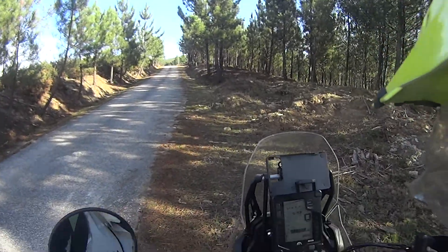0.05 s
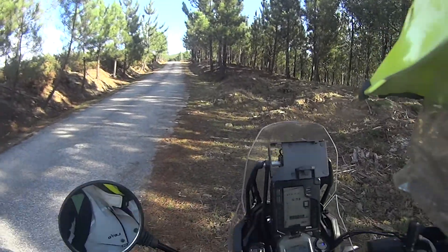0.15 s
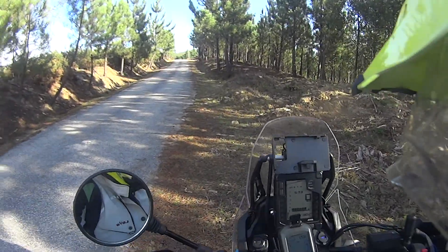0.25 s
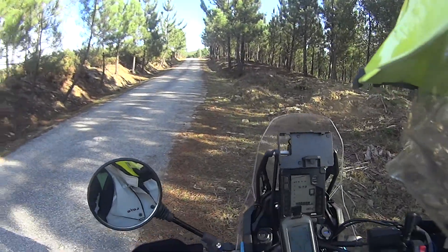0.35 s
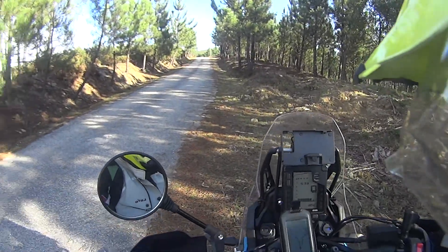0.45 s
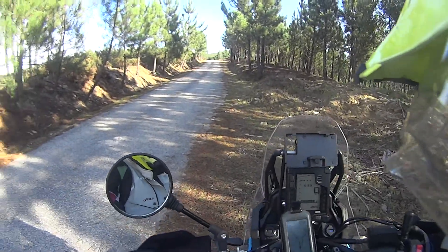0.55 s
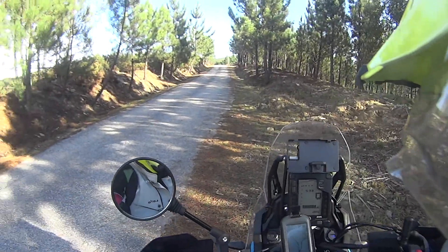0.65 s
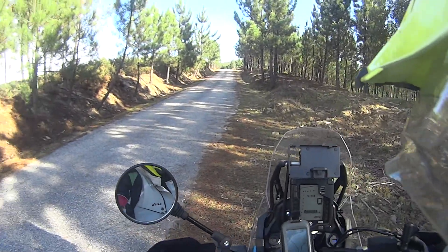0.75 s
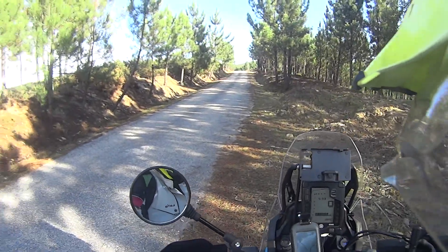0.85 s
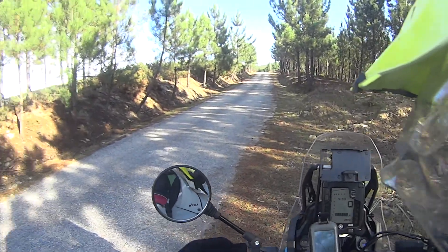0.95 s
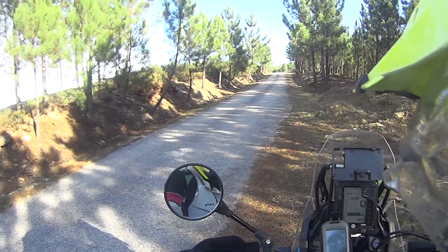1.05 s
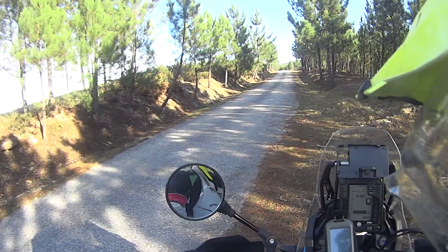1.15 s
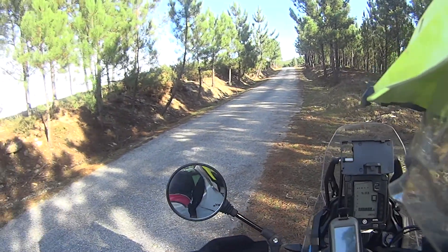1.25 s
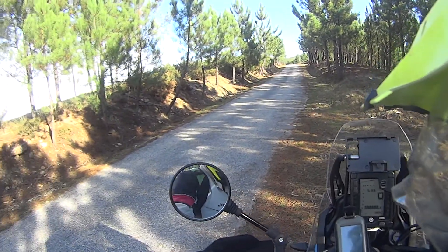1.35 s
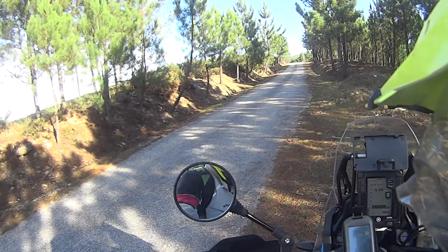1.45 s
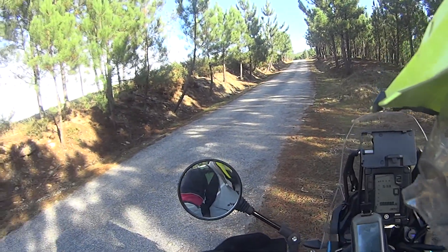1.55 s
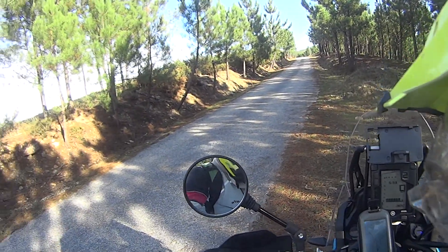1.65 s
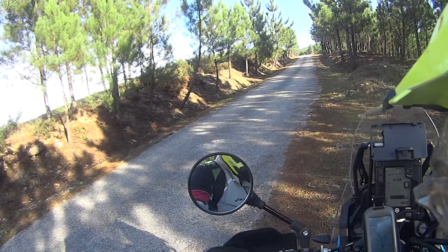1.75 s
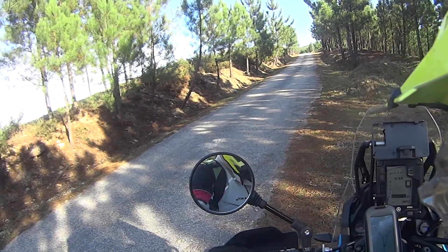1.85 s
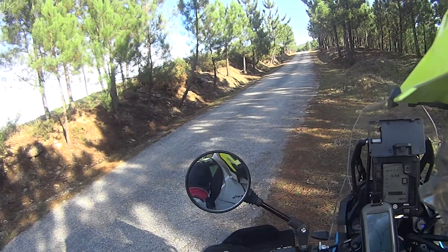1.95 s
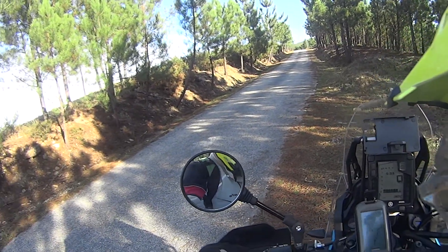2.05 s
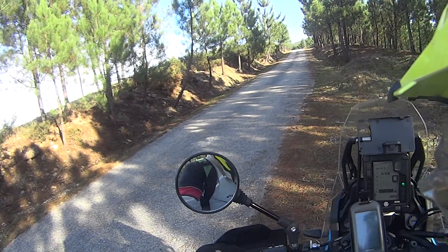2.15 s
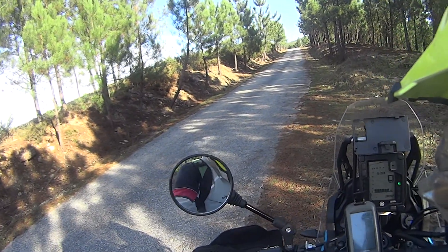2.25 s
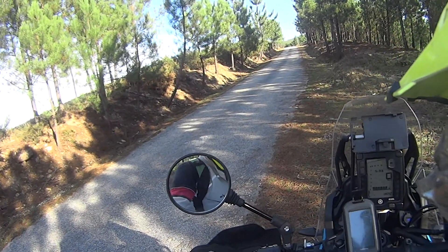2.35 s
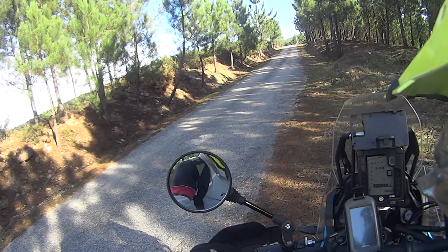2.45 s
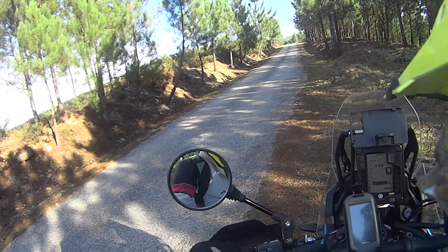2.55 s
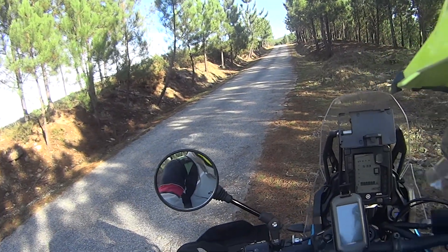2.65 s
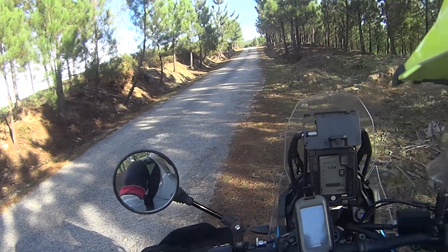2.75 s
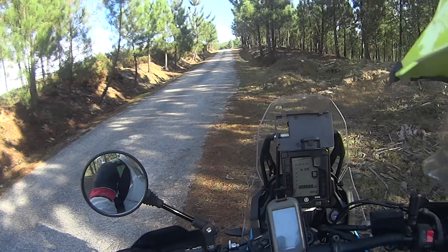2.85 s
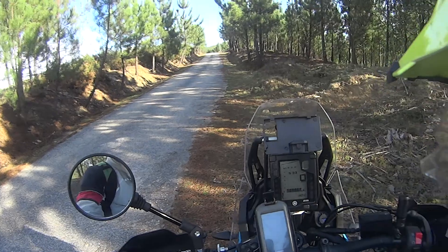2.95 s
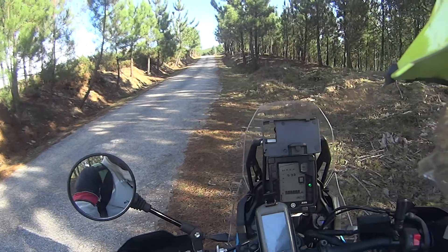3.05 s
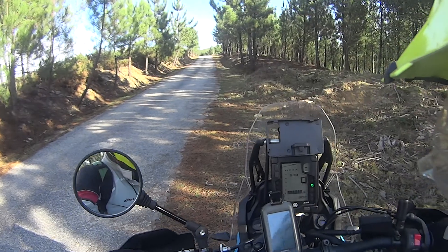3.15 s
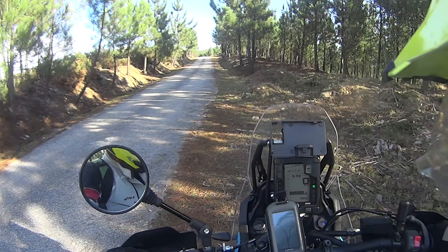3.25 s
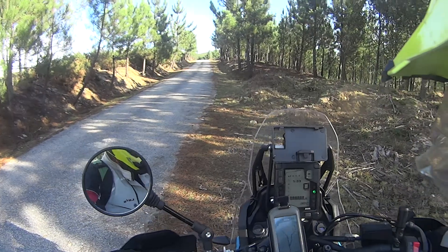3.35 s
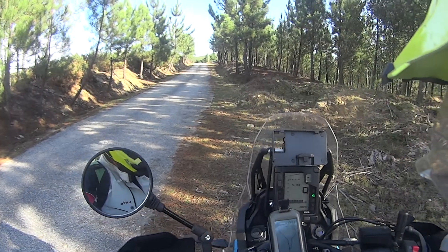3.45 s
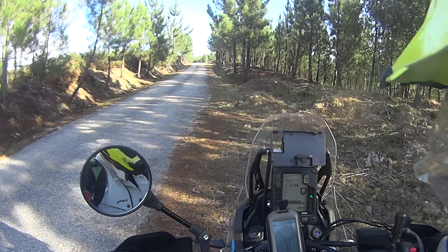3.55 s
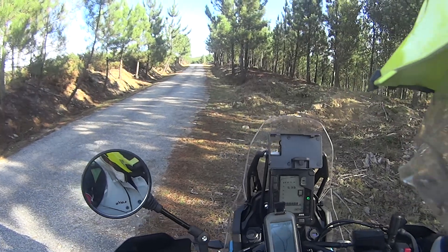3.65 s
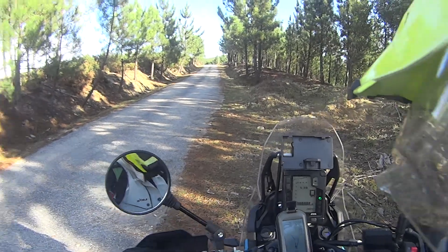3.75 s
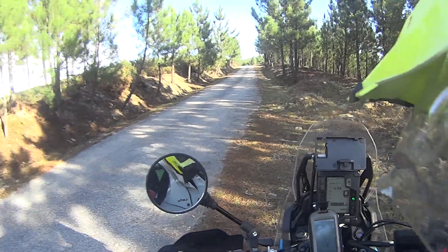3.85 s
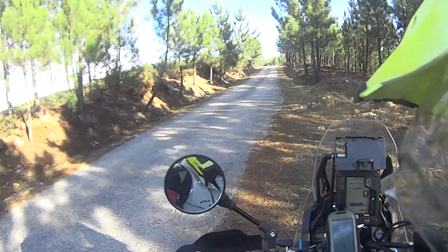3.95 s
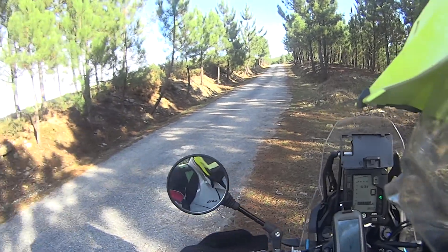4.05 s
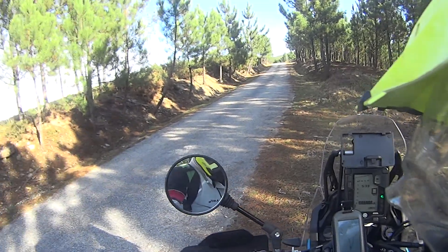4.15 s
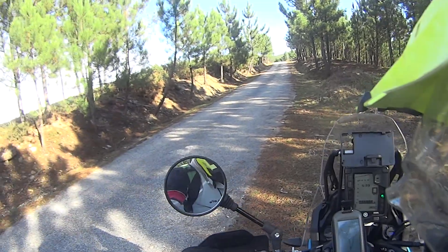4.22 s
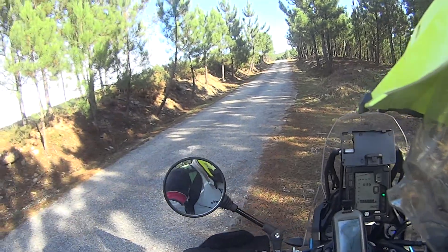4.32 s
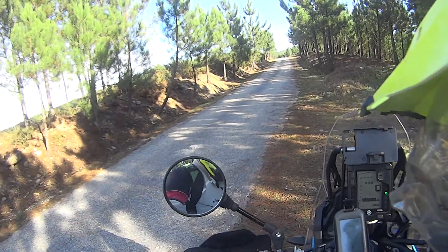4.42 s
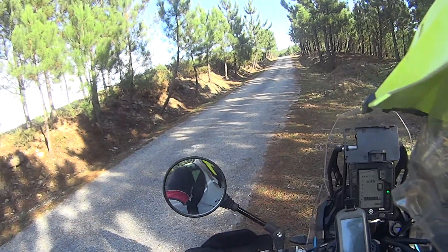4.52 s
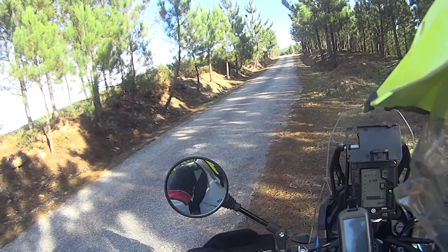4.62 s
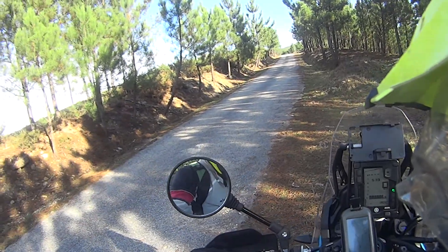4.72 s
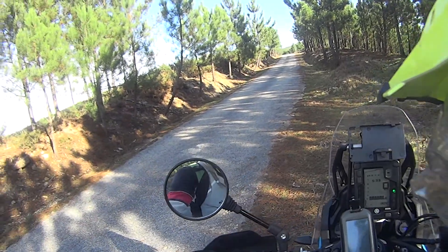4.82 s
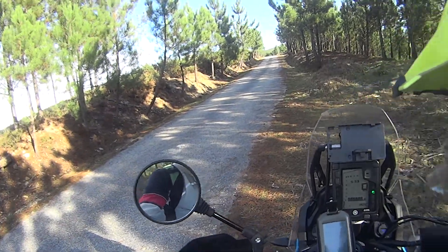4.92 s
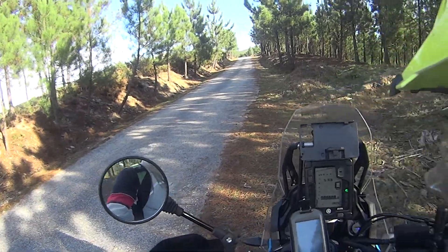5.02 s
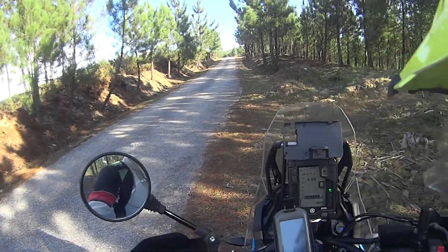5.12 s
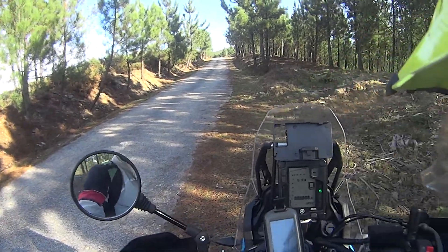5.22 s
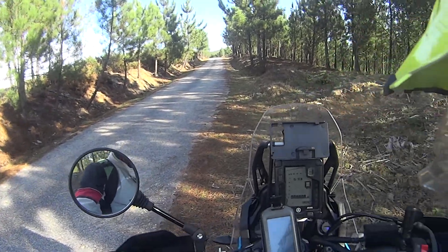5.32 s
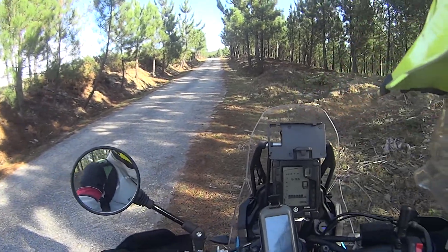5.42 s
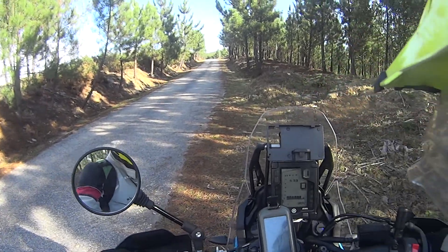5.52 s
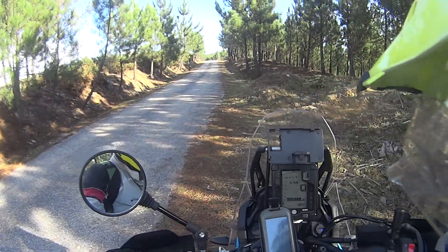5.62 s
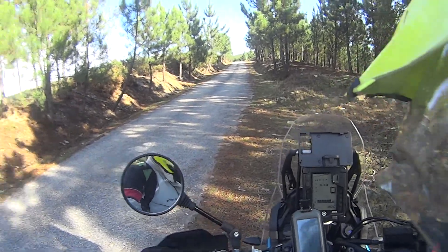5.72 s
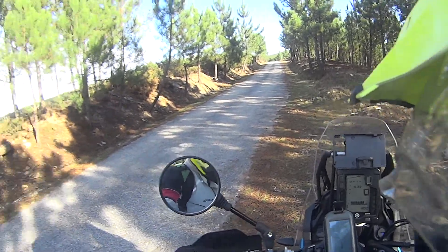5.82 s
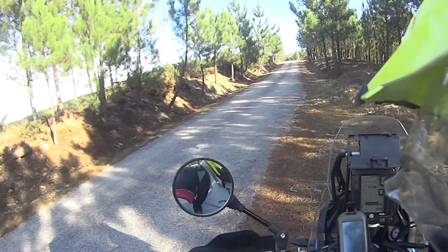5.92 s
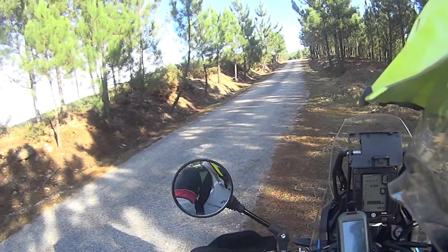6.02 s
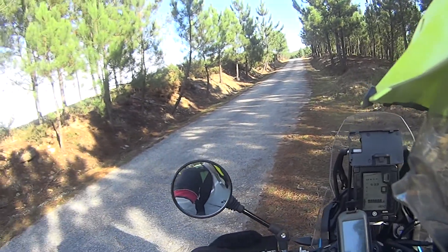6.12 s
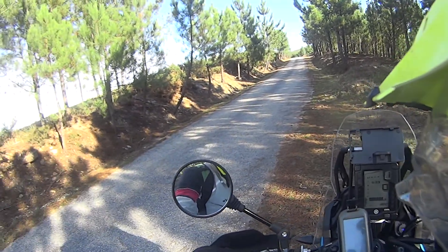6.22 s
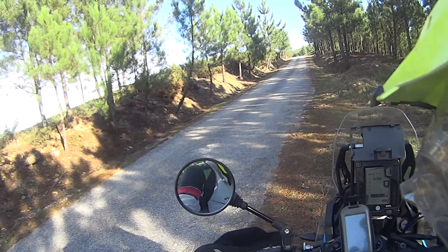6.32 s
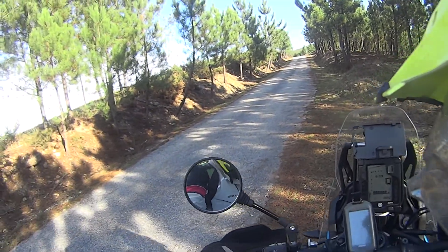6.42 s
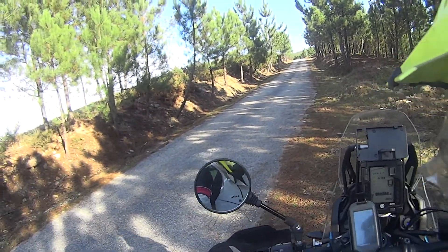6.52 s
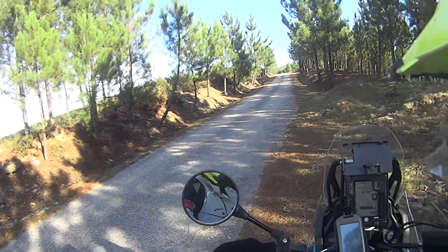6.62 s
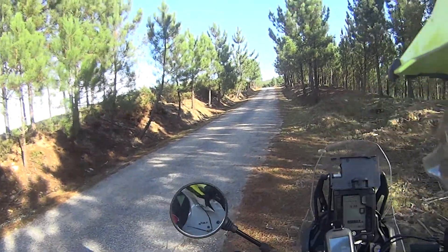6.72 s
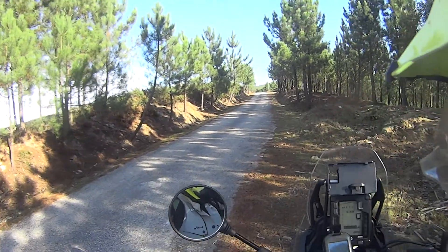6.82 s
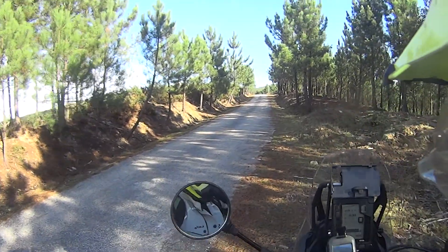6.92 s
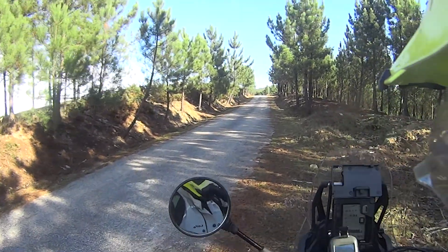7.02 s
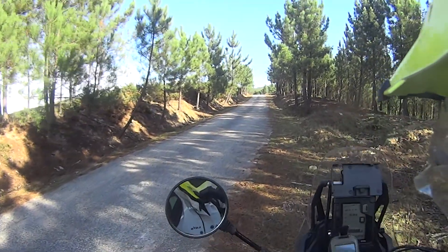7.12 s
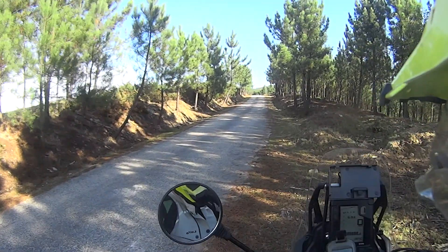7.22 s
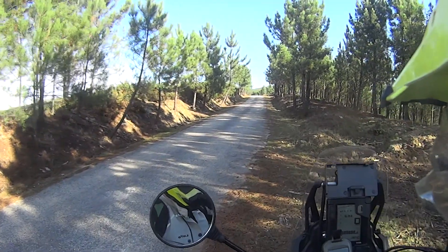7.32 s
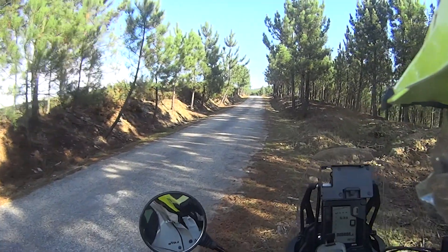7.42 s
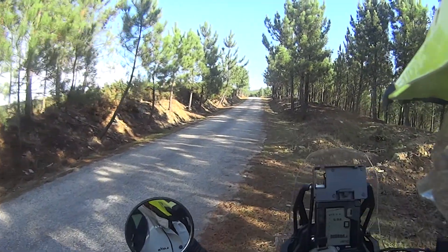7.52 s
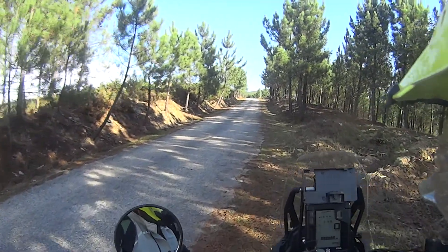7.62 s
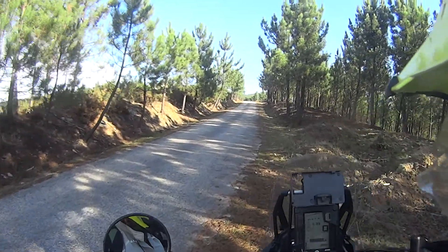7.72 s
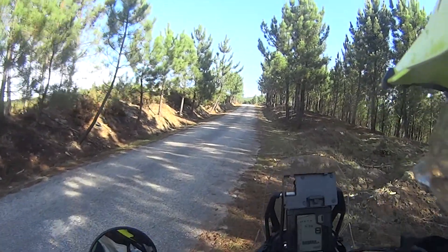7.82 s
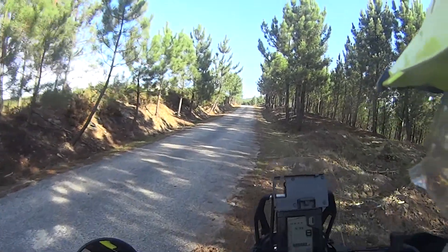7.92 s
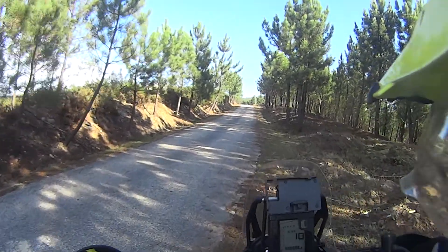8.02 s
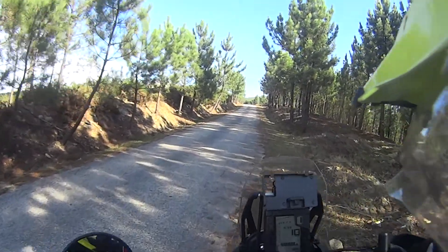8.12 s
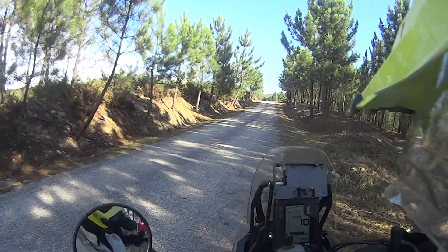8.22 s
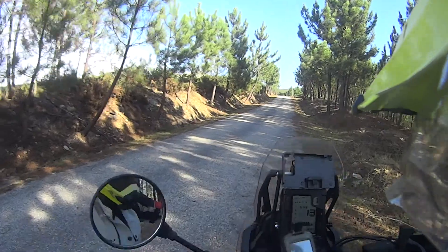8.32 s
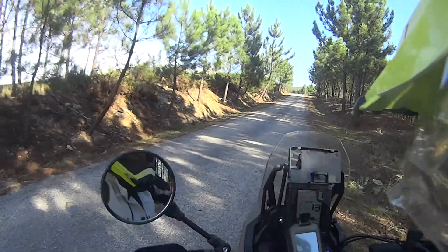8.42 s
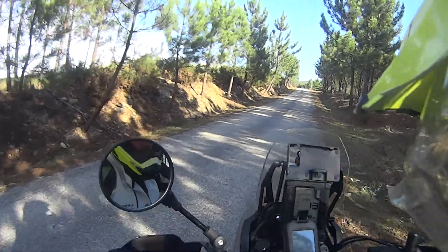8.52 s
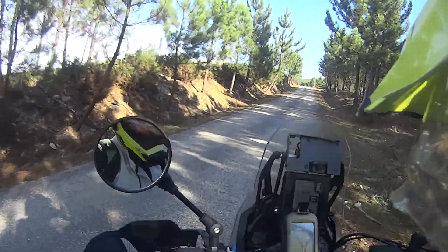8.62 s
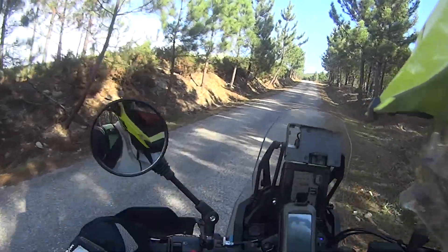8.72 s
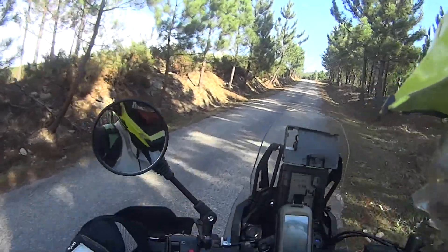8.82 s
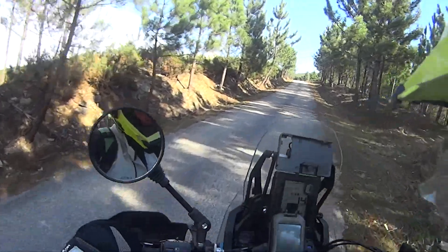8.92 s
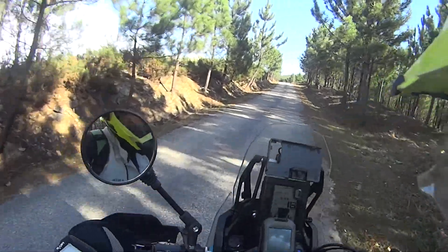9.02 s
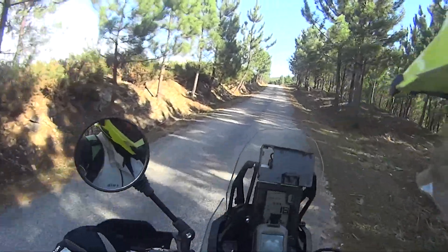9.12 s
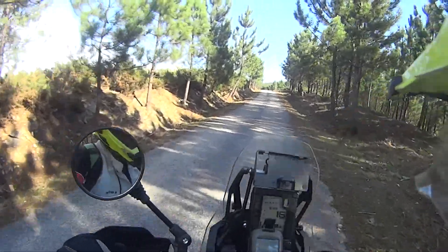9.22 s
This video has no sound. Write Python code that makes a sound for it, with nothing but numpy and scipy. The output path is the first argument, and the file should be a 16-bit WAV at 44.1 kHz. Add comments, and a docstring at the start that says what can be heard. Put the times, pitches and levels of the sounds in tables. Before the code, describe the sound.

From the rider's seat on a forest road, a motorcycle's twin engine ticks over with a low, lumpy beat and bright valve ticks. Short metallic rattles lead to a sharper clash as it goes into gear. After a quick rev the engine sags under load, then rises steadily as the bike moves off. A soft rolling hiss builds, and brief low wind buffets reach the close stereo microphone.

```python
"""A twin-cylinder motorcycle idles close by on a forest road, drops into gear, blips the throttle
and pulls away. The cylinders fire unevenly into the silencer and set it booming; the valve gear ticks
once a cycle over the whirr of the cases. As the wheels turn, chain and tyres hiss and the first gusts
of headwind buffet a small stereo microphone on the rider."""
import sys
import numpy as np
from scipy import signal
from scipy.fft import rfft, irfft
from scipy.io import wavfile

SR = 44100
rng = np.random.default_rng(int(sys.argv[2]) if len(sys.argv) > 2 else 0)


def int16_out(signal):
    """Quantize to a 16-bit WAV file."""
    q = np.round(np.clip(np.atleast_2d(signal).T, -1, 1) * 32767)
    wavfile.write(sys.argv[1], SR, q.astype(np.int16))


N = 408807
BLIP_S, SHUT_S, PULL_S, THROTTLE_MOVE_S = 5.92, 6.056, 6.19, 0.046
IDLE_RPM, MAX_CYCLES = 1300, 200   # a cycle is two turns of the crank


def from_db(db):
    """Decibels to amplitude."""
    return 10 ** (np.asarray(db) / 20)


def unit_rms(x):
    """Scale to an rms of 1."""
    return x / np.sqrt(np.mean(x ** 2) + 1e-20)


def delayed(x, delay_s):
    """The same signal, arriving later."""
    return np.pad(x, (round(delay_s * SR), 0))[:N]


def over_time(rows):
    """One curve per column, through rows that begin with a time in seconds."""
    times, *columns = np.transpose(rows)
    return [np.interp(np.arange(N) / SR, times, column) for column in columns]


def over_frequency(rows):
    """One curve per column across the FFT bins, interpolated in log frequency."""
    freqs, *columns = np.transpose(rows)
    hz = np.arange(N // 2 + 1) * SR / N + 1
    return [np.interp(np.log(hz), np.log(freqs), column) for column in columns]


def coloured_noise(spectrum):
    """Noise of rms 1 with this spectral shape."""
    shape_db, = over_frequency(spectrum)
    return unit_rms(irfft(rfft(rng.standard_normal(N)) * from_db(shape_db), N))


def drift(rate_hz):
    """Random wander of rms 1, smoothed above rate_hz."""
    step = 40   # samples per point
    pole = np.exp(-2 * np.pi * rate_hz * step / SR)
    noise = rng.standard_normal(N // step + 2002)
    slow = signal.lfilter([1], [1, -2 * pole, pole * pole], noise)[2000:]
    return np.interp(np.arange(N) / step, np.arange(len(slow)), unit_rms(slow))


def ring(clicks, hz, t60):
    """A unit click starts a decaying sine of height 1."""
    pole, angle = from_db(-60 / (t60 * SR)), 2 * np.pi * hz / SR
    return signal.lfilter([0, np.sin(angle)], [1, -2 * pole * np.cos(angle), pole * pole], clicks + 1e-18)


def headwind():
    """Gusts press on both microphone ports in low, lumpy swings."""
    # gusts: centre_s, level_db, half_length_s
    gusts = [(6.124, -45.5, 0.056), (8.684, -52, 0.044), (8.76, -50, .04), (8.825, -40, 0.035),
             (8.9, -49, .04), (8.97, -51, 0.06)]
    t = np.arange(N) / SR
    lumps = coloured_noise([(12, -13), (25, -6), (40, 0), (55, -2), (120, -27), (400, -58)])
    out = np.zeros(N)
    for centre_s, db, half_s in gusts:
        swell = np.exp(-((t - centre_s) / half_s) ** 2)
        gust = swell * lumps
        out += from_db(db) * gust * np.sqrt(np.sum(swell ** 2) / np.sum(gust ** 2))
    return out


def chain_and_tyres():
    """A grainy midrange hiss grows as the wheels start to turn."""
    # rise of the hiss: time_s, level_db
    levels = [(6.3, -83), (6.7, -62.5), (7.7, -54.5), (8.2, -51.5), (8.7, -52.5), (9.27, -43)]
    # its colour: freq_hz, density_db
    spectrum = [(300, -28), (500, -11), (750, -9), (950, 0), (1150, 2), (1500, -5), (2500, -32)]
    return from_db(over_time(levels)[0] + 2.1 * drift(41)) * coloured_noise(spectrum)


def gear_rattles():
    """Short grating clashes of metal; only the hard ones reach the low ring of the gearbox."""
    # gear lever, clutch and loose parts: start_s, strength_db, rise_s, t60_s
    hits = [(0.066, -25, 0.0016, 0.038), (1.825, -24, 0.0047, 0.073), (3.07, -25, 0.004, 0.065),
            (3.0945, -25, .0015, 0.06), (3.128, -33, .004, 0.18), (4.435, -23.5, 0.011, 0.18),
            (4.489, -23, 0.0049, 0.031), (4.536, -22.5, 0.0031, 0.036), (4.561, -26, 0.0022, 0.066),
            (5.304, -15.5, 0.0054, 0.14), (5.318, -13, 0.0036, 0.046), (5.326, -32, 0.003, 0.032),
            (5.397, -19, 0.0012, 0.046), (5.413, -29, 0.0024, 0.04), (5.498, -21.5, 0.0032, 0.051),
            (5.639, -23.5, 0.0027, 0.07), (5.65, -28, 0.001, 0.052), (5.659, -29, 0.0018, 0.044),
            (5.67, -29, .001, .07), (5.685, -27, .003, 0.036), (5.87, -25, .003, 0.038),
            (5.941, -29, 0.0018, .06)]
    # clashing metal: freq_hz, density_db
    spectrum = [(88, -47), (150, 1), (276, -8), (425, -3.5), (1040, 0.5), (1320, 13.5), (1500, -8.5),
                (2030, -5), (2760, 0), (3000, -1), (3300, 2.5), (3650, -1.5), (4020, 1), (4320, -2),
                (5170, 1), (5860, -5), (6400, -4), (6800, 0), (7150, -6), (7500, -1.5), (11000, -17),
                (14300, -54), (22000, -120)]
    bright, deep, t = np.zeros(N), np.zeros(N), np.arange(SR // 2) / SR
    for start_s, db, rise_s, t60 in hits:
        at = round(start_s * SR)
        burst = from_db(db - 11 - 60 * t / t60) * np.minimum(t / rise_s, 1)
        bright[at:at + len(t)] += burst
        deep[at:at + len(t)] += burst * from_db(min(0.79 * (db + 12.5), 0) - 100 * t)
    clash = coloured_noise(spectrum) * from_db(0.36 * drift(200))
    low = signal.sosfiltfilt(signal.butter(2, 1900, fs=SR, output="sos"), clash)
    return bright * (clash - low) + delayed(deep, 0.0056) * low   # the ring follows the clash


def contact_envelope(contacts, cycle, load, uneven_db):
    """Engine parts touch at the same point of each cycle, with a new strength every time."""
    power = np.zeros(N)
    for position, half_length, unloaded_db, loaded_db in contacts:
        count, phase = np.divmod(cycle - position + 1.5, 1)
        chance = np.clip(rng.standard_normal(MAX_CYCLES), -2, 2)[count.astype(int)]
        db = unloaded_db + load * (loaded_db - unloaded_db) + uneven_db * (0.66 - load) * chance
        swell = np.exp(-((phase - .5) / half_length) ** 2)
        power += (from_db(db) * swell) ** 2
    return np.sqrt(power)


def case_whirr(cycle, load):
    """Gears and chains whirr inside the cases, swelling as the pistons knock."""
    # cases running light: freq_hz, density_db
    whirr = [(180, -11.5), (300, -2.5), (328, -11), (431, -3.5), (667, -12.5), (1420, 0.5), (1550, -8.5),
             (1720, -3), (2060, -9.5), (3150, -2.5), (4190, -4.5), (5020, -3), (6020, -10), (7660, -10),
             (11000, -16.5), (14300, -117), (22000, -120)]
    # cases under load: freq_hz, density_db
    roar = [(180, -3.5), (300, -7), (406, -6), (741, -14), (1000, -11), (1150, -3), (1420, -4), (1550, -9),
            (1830, -10), (2290, -7.5), (3200, -2.5), (4070, -5), (5420, -6), (6020, -11.5), (7430, -11),
            (11000, -19), (14300, -101), (22000, -120)]
    # piston knocks: position_cycles, half_length_cycles, unloaded_db, loaded_db
    pistons = [(0.465, 0.061, -12, 0.5), (0.84, 0.15, -4, -2.5), (0.9, 0.04, -25, 1.5),
               (0.38, 0.21, -2, -16.5), (0.032, 0.15, -7, -6), (0.597, 0.064, -13, -5)]
    body = unit_rms((1 - load) * coloured_noise(whirr) + load * coloured_noise(roar))
    knocks = from_db(2.5) * contact_envelope(pistons, cycle, load, uneven_db=0.65)
    flicker = from_db(0.32 * drift(1.4) + drift(44) + drift(100))
    return body * flicker * np.hypot(from_db(-3 * load), knocks)


def valve_ticks(cycle, load):
    """Each contact in the valve gear gives a bright tick of noise."""
    # colour of a tick: freq_hz, density_db
    spectrum = [(1500, -25), (2200, -12.5), (3200, -0.5), (4300, -9.5), (5000, -1), (6000, -5.5),
                (7500, -4.5), (9000, -5.5), (11000, -17)]
    # valve gear contacts: position_cycles, half_length_cycles, unloaded_db, loaded_db
    contacts = [(0.924, 0.049, -1.5, -6.5), (0.32, 0.059, -30, 4), (0.26, 0.037, -13, -14),
                (0.9, 0.024, -38, 9.5), (0.83, 0.028, -27, -0.5), (0.438, 0.025, -39, -11),
                (0.23, 0.071, -10.5, -1.5), (0.56, 0.26, -21.5, -5.5)]
    return coloured_noise(spectrum) * contact_envelope(contacts, cycle, load, uneven_db=0.9)


def valve_seating(cycle, level_db, uneven_db):
    """A valve snaps shut every cycle, bounces once and rings the cylinder head."""
    # modes of the head: pitch_hz, gain_db, t60_s
    head_modes = [(3090, -8.5, .03), (3430, -10, 0.034), (4700, -7.5, 0.036), (4877, 1, 0.032),
                  (5110, 0.5, 0.03), (5590, -4, 0.019), (6580, -7, .02), (7400, -11.5, 0.023),
                  (8530, -24, .015), (9700, -13, .012)]
    # the hardest seatings, each taking the place of the nearest regular one: start_s, strength_db
    hard_seats = [(0.8636, -37.5), (0.953, -37.5), (1.3109, -41), (1.4945, -36), (1.6751, -38),
                  (1.8537, -39), (2.0358, -41), (2.2133, -39), (2.4833, -40.5), (2.5735, -37),
                  (2.8444, -42), (3.2984, -39), (3.487, -47), (3.578, -36), (3.667, -37), (3.7547, -36),
                  (3.8422, -38.5), (4.017, -35.5), (4.1058, -36), (4.1936, -39.5), (4.283, -39),
                  (4.3708, -38), (4.6309, -39), (4.808, -37), (5.9515, -33), (6.0086, -35), (6.0555, -33),
                  (6.1035, -33.5), (6.2158, -35), (6.277, -36), (6.4036, -36), (6.4715, -38), (6.5475, -42),
                  (6.818, -40), (6.997, -39), (7.09, -39), (7.2495, -39), (7.8376, -35), (7.917, -34),
                  (8.1409, -29)]
    at = np.flatnonzero(np.diff(np.floor(cycle + .082)))
    db = level_db[at] + uneven_db * rng.standard_normal(MAX_CYCLES)[:len(at)]
    for start_s, hard_db in hard_seats:
        nearest = np.argmin(abs(at - start_s * SR))
        at[nearest], db[nearest] = round(start_s * SR), hard_db - 6.5
    out = np.zeros(N)
    for hz, mode_db, t60 in head_modes:
        snap_chance, gap_chance, bounce_chance = rng.standard_normal((MAX_CYCLES, 3))[:len(at)].T
        gap_s = .0025 + .0008 * np.clip(gap_chance, -2, 2)
        clicks = np.zeros(N + SR)
        clicks[at] = from_db(db + mode_db - 2.5 + 2.1 * snap_chance)
        clicks[at + np.round(gap_s * SR).astype(int)] = from_db(db + mode_db - 1.5 + 2.7 * bounce_chance)
        out += ring(clicks[:N], hz, t60)
    return out


def case_resonance(shake):
    """The engine cases lift narrow bands out of whatever shakes them."""
    # steady case modes: pitch_hz, width_hz, lift_db
    steady_modes = [(843, 15, 5), (1107, 28, 4), (2307, 75, 6.5), (2600, 76, 5.5), (2833, 84, 4.5),
                    (3074, 60, 5.5), (3138, 47, 7), (3307, 50, 3.5), (3356, 54, 4), (3470, 38, 5.5),
                    (3764, 160, 4), (5000, 45, 0.5), (5260, 58, 3), (5465, 60, 5), (6700, 80, -0.5),
                    (7400, 66, 4), (8230, 90, 0.5)]
    # two whining modes: pitch_hz, width_hz
    whine_modes = [(1430, 19), (1690, 31)]
    # the whines come and go: time_s, lower_lift_db, upper_lift_db
    whine_lifts = [(0, 10, 8), (.3, 6.5, -5), (.6, 7, 12.5), (.9, 5, 8), (1.15, 9, -3), (1.35, -8, 12),
                   (1.7, 0, 6), (2.3, -2, 9), (2.7, 0, 7), (3.1, 3, -1), (3.4, 7, 9.5), (3.7, 2, -6),
                   (4.2, 9, 3), (4.35, 5, 6), (5.2, 4, 3), (5.9, 3, 9.5), (6.15, 9, 1), (6.35, 11, 10),
                   (6.8, 10, 9), (7.7, 10.5, 8), (8.6, 9.5, 5.5), (9.27, 11, 7)]
    hz = np.arange(N // 2 + 1) * SR / N
    lift_db = sum(db / (1 + (2 * (hz - pitch) / width) ** 2) for pitch, width, db in steady_modes)
    out = irfft(rfft(shake) * from_db(lift_db), N)
    for (pitch, width), db in zip(whine_modes, over_time(whine_lifts)):
        out += (from_db(db) - 1) * signal.lfilter(*signal.iirpeak(pitch, pitch / width, SR), shake)
    return out


def throttle():
    """Load (0-1) through blip, shut and pull-away, and how free of the clutch the engine spins (0-1)."""
    closed_load, open_load, clutch_take_up_s = 0.19, 0.87, 0.89
    t = np.arange(N) / SR
    blip, shut, pull = [np.clip((t - s) / THROTTLE_MOVE_S, 0, 1) for s in (BLIP_S, SHUT_S, PULL_S)]
    load = closed_load + (open_load - closed_load) * (blip - 0.49 * (shut - pull))
    free = blip * np.clip(1 - (t - PULL_S) / clutch_take_up_s, 0, 1)
    return load, free


def gas_rush(rev_octaves, level_db, load):
    """Turbulence at the exhaust outlet makes a low, fluttering rush."""
    # colour of the rush: freq_hz, density_db
    spectrum = [(60, -30), (110, 5), (170, 1), (300, -6), (450, -12), (800, -28)]
    rush_db = level_db - 5 - 8.8 * load - 2.6 * rev_octaves + 2 * drift(35)
    return from_db(rush_db) * coloured_noise(spectrum)


def silencer_outlet(pulses, rpm):
    """The silencer softens the pulses, and its small outlet radiates no deep bass."""
    hollow_hz, hollow_width_hz = 178, 17.6   # a side chamber swallows this band
    out = signal.sosfilt(signal.butter(2, 363, fs=SR, output="sos"), pulses)
    out = signal.sosfilt(signal.butter(2, 44.6, "high", fs=SR, output="sos"), out)
    out -= 0.72 * signal.lfilter(*signal.iirpeak(hollow_hz, hollow_hz / hollow_width_hz, SR), out)
    bass = signal.sosfiltfilt(signal.butter(2, 62, fs=SR, output="sos"), out)
    out -= np.clip(0.85 * np.log2(rpm / 1400), 0, .9) * bass   # the bass thins as the revs rise
    # faster firing packs the same level into smaller pulses
    return from_db(4.5) * out / np.sqrt(rpm / IDLE_RPM)


def exhaust(cycle, rpm, level_db, load, uneven_db):
    """Firings 270 and 450 crank degrees apart kick the silencer's modes, no two charges alike."""
    # silencer modes: pitch_hz, first_cylinder_db, second_cylinder_db, load_change_db,
    # db_per_rpm_doubling, unloaded_t60_s, loaded_t60_s
    modes = [(36, -12, -15, -16, -18, 0.11, .1), (60.3, -0.5, 7, 10.5, -18, 0.21, 0.028),
             (88.5, 9, 6.5, -8, -7.5, 0.17, 0.11), (103.5, -0.5, -0.5, 5.5, 4.5, 0.01, 0.083),
             (219.4, 2, 1, 7, -15.5, 0.1, 0.042), (236.7, -5.5, 1.5, 1, 9.5, 0.04, 0.015),
             (276, -8, -5, 8.5, 2, 0.28, 0.085), (351, -1, 0, -1, -3, 0.11, 0.074)]
    # the pulse runs back and forth in the header: delay_s, gain_db
    echoes = [(0.0122, -10), (0.024, -16.5)]
    t, out = np.arange(N) / SR, np.zeros(N)
    rev_octaves = np.log2(rpm / IDLE_RPM)
    # running down on a shut throttle, both cylinders pop late, the first one louder
    overrun = (t > SHUT_S) & (t < PULL_S + THROTTLE_MOVE_S / 2)
    overrun_late_s, overrun_db = (.0105, .007), (2.5, -9)
    # the exhaust valves open early; load and revs bring the pulses further forward
    lead_cycles = 0.0479 + load * (.01 + .022 * np.maximum(np.log2(rpm / 1500), 0))
    firings = [np.flatnonzero(np.diff(np.floor(cycle + lead_cycles + offset)))
               for offset in (3 / 8, .005 * load)]
    chamber = signal.butter(2, [190, 330], "band", fs=SR, output="sos")
    charge = rng.standard_normal((MAX_CYCLES, 2))
    for hz, first_db, second_db, load_db, rev_db, unloaded_t60, loaded_t60 in modes:
        mode_db = level_db + load_db * load + rev_db * rev_octaves
        kicks = np.zeros(N)
        for cylinder, (at, db) in enumerate(zip(firings, (first_db, second_db))):
            # high modes vary most, and weak idling charges burn less evenly than full ones
            chance = charge[:, cylinder] + hz / 250 * rng.standard_normal(MAX_CYCLES)
            burn_db = uneven_db * (1.3 - load[at]) * chance[:len(at)]
            late = round(overrun_late_s[cylinder] * SR) * overrun[at]
            kicks[at + late] = -from_db(mode_db[at] + db + burn_db + overrun_db[cylinder] * overrun[at])
        if hz > 180:   # upper modes are fed through a chamber and swell in
            kicks = from_db(2) * signal.sosfilt(chamber, kicks)
        else:   # the big volumes fill a little later
            kicks = delayed(kicks, 0.0044)
        out += ring(kicks * (1 - load), hz, unloaded_t60) + ring(kicks * load, hz, loaded_t60)
    # under load the sharp upper part of the pulse comes back stronger
    reflected = out + (from_db(2 * load) - 1) * signal.sosfiltfilt(chamber, out)
    out += sum(from_db(db + 4.5 * rev_octaves) * delayed(reflected, delay_s) for delay_s, db in echoes)
    return silencer_outlet(out, rpm) + gas_rush(rev_octaves, level_db, load)


def stereo_microphone(mid, scatter_s):
    """The two ports differ in gain and phase, and in what rider, tank and road scatter to them."""
    # left port against right: freq_hz, balance_db, left_lead_rad, coherence
    ports = [(43, 1.5, 0.14, 0.99), (173, 1, 0.2, 0.94), (344, 1.5, 0.51, 0.92), (500, -4, 0.15, 0),
             (670, -2.5, 4.4, 0.9), (860, -0.5, 1.5, 0.56), (1119, -4, 1.26, .9), (1722, -4, 1.8, 0.87),
             (2170, -4.5, 1.24, 0.8), (2720, -8.5, 1.2, 0.8), (3875, -4, 1.05, 0.92),
             (5598, -3, 0.72, 0.99), (8700, -2.5, 0.63, 0.76), (11100, 0, 0.26, 0.96)]
    balance_db, lead_rad, coherence = over_frequency(ports)
    t = np.arange(SR // 5) / SR
    tail = rng.standard_normal(len(t)) * np.exp(-t / scatter_s)
    scatter = rfft(tail / np.sqrt(np.sum(tail ** 2)), N)
    left_power, right_power = from_db(balance_db), from_db(-balance_db)
    cross = coherence * np.exp(1j * lead_rad)
    mid_power = left_power + right_power + 2 * cross.real
    side_power = left_power + right_power - 2 * cross.real
    direct = (left_power - right_power + 2j * cross.imag) / mid_power
    diffuse = np.sqrt(np.maximum(side_power / mid_power - np.abs(direct) ** 2, 0))
    side = irfft(rfft(mid) * (direct + diffuse * scatter), N)
    return np.array([mid + side, mid - side])


def scene():
    """The motorcycle from the saddle: one crankshaft times the exhaust, pistons and valves."""
    # crankshaft: time_s, speed_rpm
    crank_speed = [(0.0, 1251.7), (0.25, 1314.9), (0.65, 1253.0), (0.75, 1261.4), (1.0, 1388.5),
                   (1.1, 1339.8), (1.25, 1307.2), (1.5, 1308.2), (1.65, 1337.1), (2.05, 1334.2),
                   (2.25, 1368.6), (2.4, 1313.1), (2.5, 1327.8), (2.7, 1326.9), (3.0, 1354.4),
                   (3.25, 1266.5), (3.35, 1263.1), (3.75, 1382.6), (4.0, 1354.5), (4.15, 1367.9),
                   (4.25, 1344.1), (4.5, 1392.9), (4.6, 1372.1), (4.75, 1361.8), (5.25, 1413.5),
                   (5.65, 1270.1), (5.75, 1296.3), (5.9, 1357.4), (6.04, 2600.0), (6.12, 2440.0),
                   (6.2, 1833.0), (6.3, 2047.9), (6.5, 1571.2), (6.65, 1307.9), (6.85, 1284.4),
                   (7.3, 1446.3), (7.4, 1466.4), (7.7, 1409.1), (7.8, 1449.7), (7.95, 1546.2),
                   (8.2, 1872.4), (8.3, 1862.6), (8.45, 1929.6), (8.6, 2130.6), (9.0, 2261.9),
                   (9.27, 2619.8)]
    # base levels of the engine: time_s, exhaust_db, whirr_db
    engine_levels = [(0, -59.5, -45.5), (.5, -59, -47), (2.5, -57.5, -47.5), (3, -58, -45.5),
                     (3.3, -57.5, -46), (5.0, -57, -46.5), (5.2, -56.5, -43.5), (5.6, -58, -46.5),
                     (5.9, -57.5, -47), (5.94, -44, -41), (6.01, -38.5, -39.5), (6.06, -46.5, -38),
                     (6.15, -48, -37.5), (6.18, -54, -39.5), (6.205, -55, -40), (6.23, -46.5, -41),
                     (6.33, -45, -41), (6.45, -47, -42), (6.7, -50.5, -44.5), (7.8, -48.5, -40.5),
                     (8.15, -43.5, -37), (8.4, -43.5, -36), (9, -43, -35.5), (9.27, -38, -32.5)]
    # the valve tick swells and sinks: time_s, change_db
    tick_swell = [(0, -1.5), (.3, 2), (.7, 0.5), (.85, 1.5), (1.6, 0), (1.8, 0.5), (2.1, 1.5), (2.4, 0),
                  (2.9, 3.5), (3.2, -1), (3.5, 4), (4.2, -1.5), (4.5, 0.5), (5.2, 1.5), (5.6, 0.5),
                  (6.1, -2.5), (6.5, -1), (7, -5), (7.5, -4), (7.9, -6), (8.2, -2), (8.6, -2), (9.27, -2)]
    rpm, = over_time(crank_speed)
    rev_octaves = np.log2(rpm / IDLE_RPM)
    cycle = .687 + np.cumsum(rpm) / (120 * SR)
    exhaust_db, whirr_db = over_time(engine_levels)
    load, free = throttle()
    tick_over_whirr_db = 9 - 8.5 * load - 1.5 * free + rev_octaves + over_time(tick_swell)[0]
    # against the ticks, the valve seats harder revving free and under load
    seat_db = whirr_db + tick_over_whirr_db - 14 + 6 * free + 5.5 * load - 3 * rev_octaves
    pipes = exhaust(cycle, rpm, exhaust_db, load, uneven_db=0.45)
    whirr = case_whirr(cycle, load)
    ticks = from_db(tick_over_whirr_db) * valve_ticks(cycle, load)
    seats = valve_seating(cycle, seat_db, uneven_db=2)
    metal = case_resonance(from_db(whirr_db - 4.5) * (whirr + ticks) + seats + gear_rattles())
    return stereo_microphone(pipes + metal + chain_and_tyres() + headwind(), scatter_s=0.029)


def record(dry):
    """The treble ends steeply above 11.1 kHz."""
    return signal.sosfilt(signal.ellip(10, .5, 70, 11100, fs=SR, output="sos"), dry)


dry = scene()
out = record(dry)
int16_out(out)
```